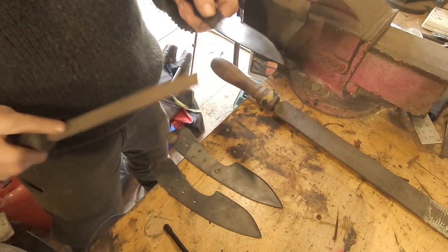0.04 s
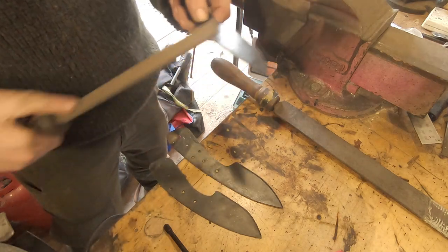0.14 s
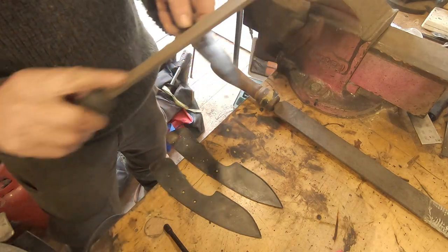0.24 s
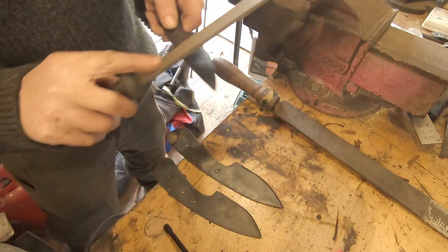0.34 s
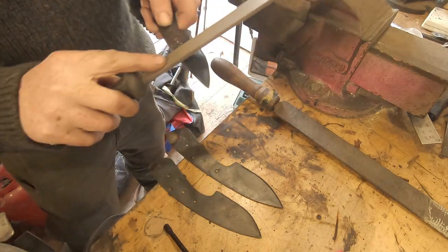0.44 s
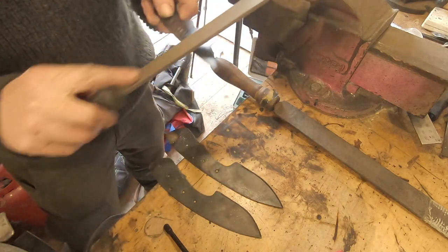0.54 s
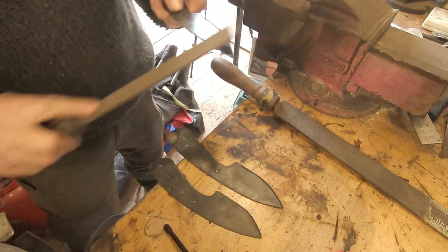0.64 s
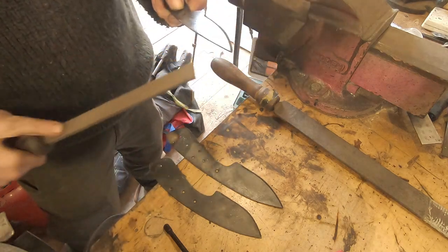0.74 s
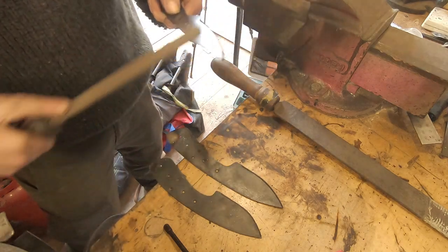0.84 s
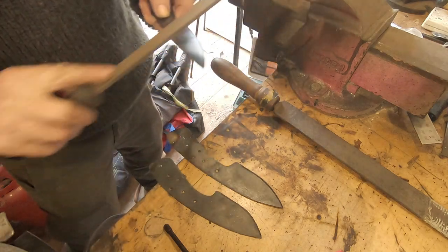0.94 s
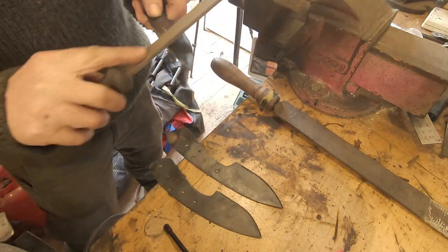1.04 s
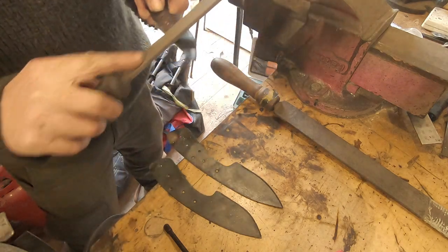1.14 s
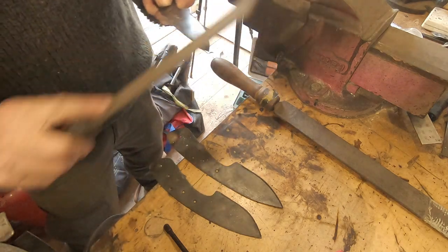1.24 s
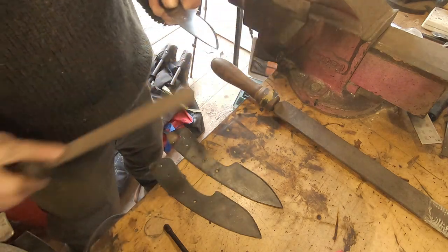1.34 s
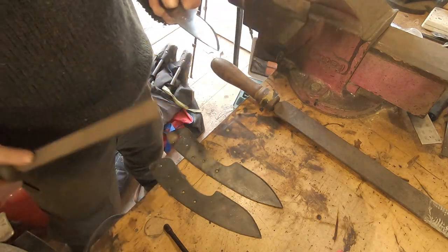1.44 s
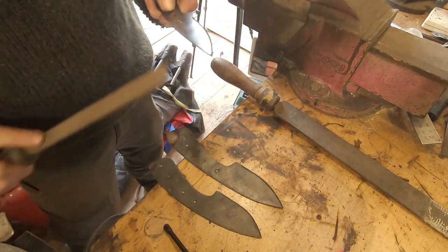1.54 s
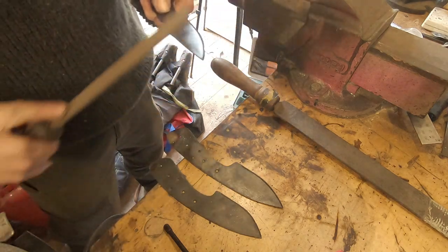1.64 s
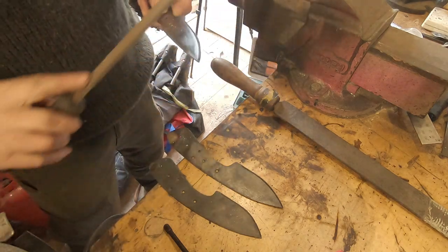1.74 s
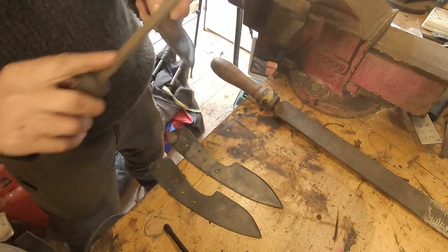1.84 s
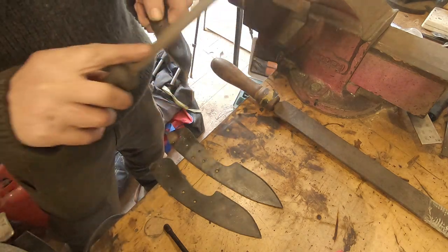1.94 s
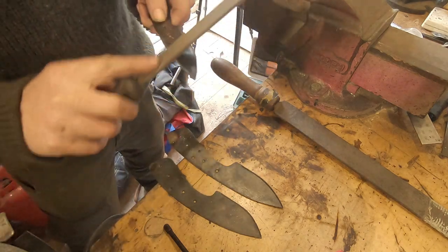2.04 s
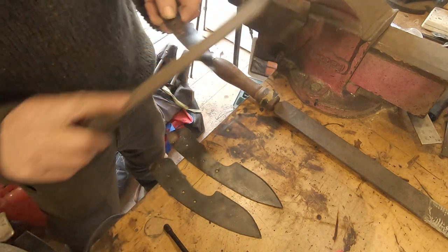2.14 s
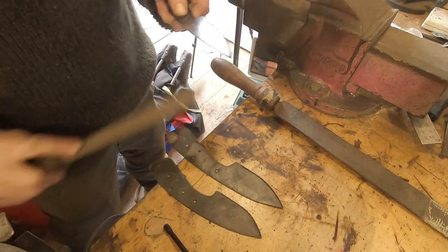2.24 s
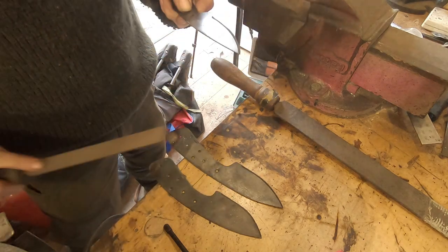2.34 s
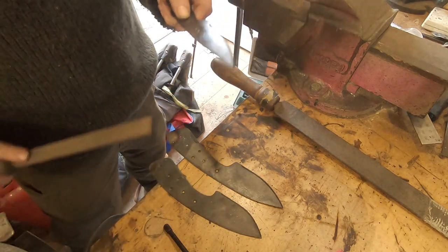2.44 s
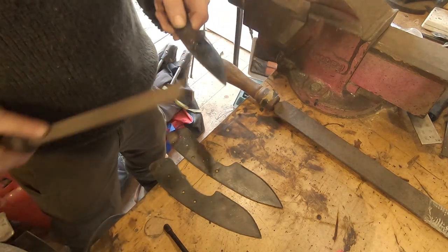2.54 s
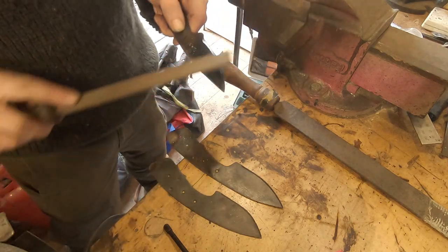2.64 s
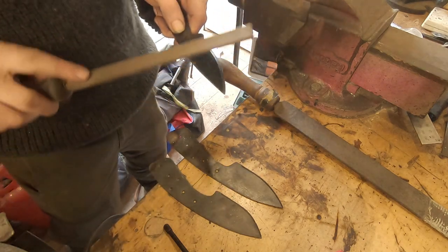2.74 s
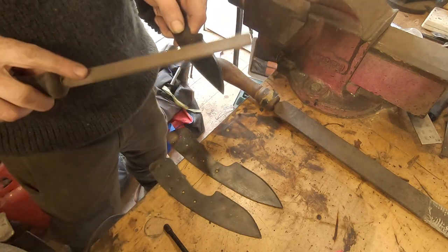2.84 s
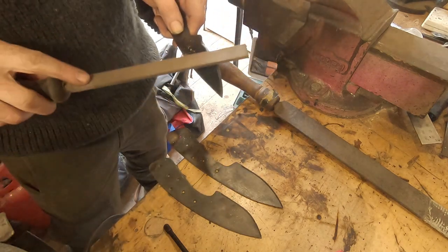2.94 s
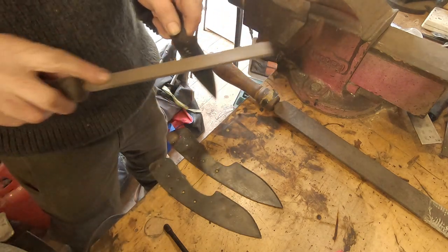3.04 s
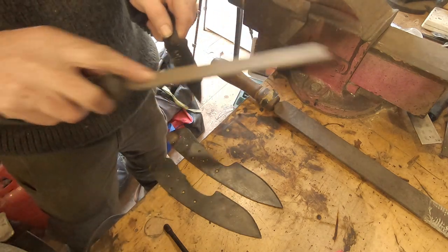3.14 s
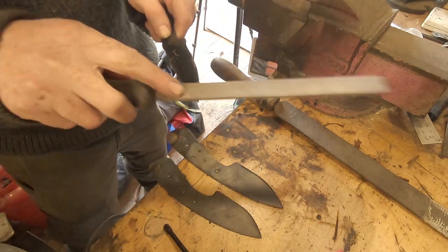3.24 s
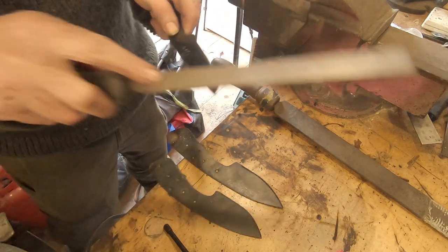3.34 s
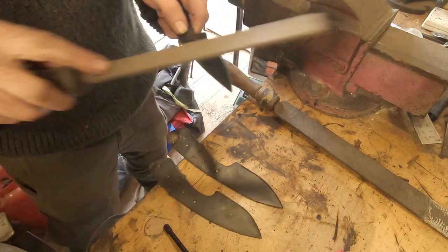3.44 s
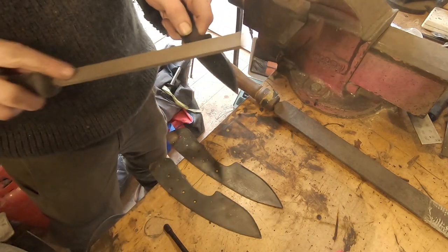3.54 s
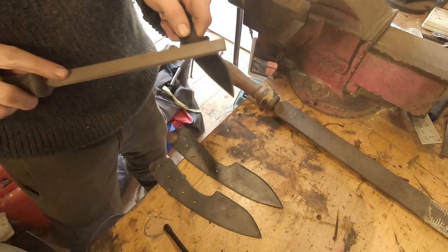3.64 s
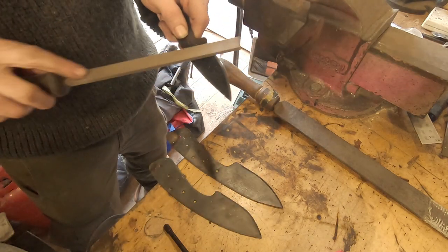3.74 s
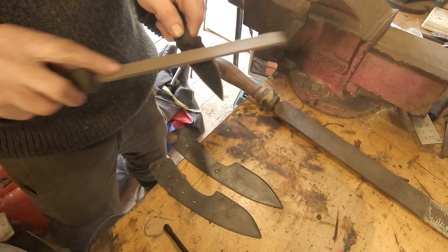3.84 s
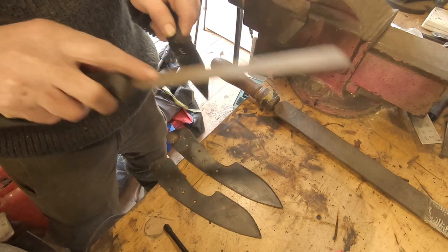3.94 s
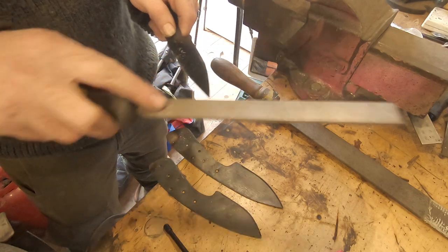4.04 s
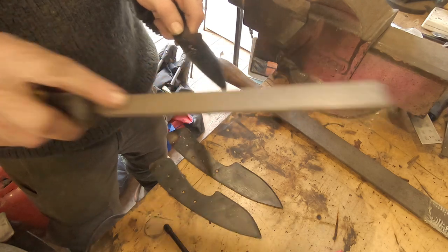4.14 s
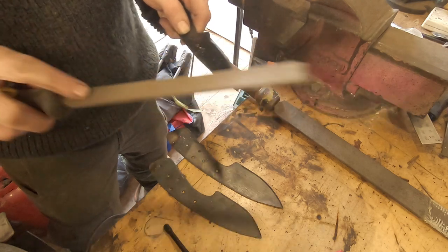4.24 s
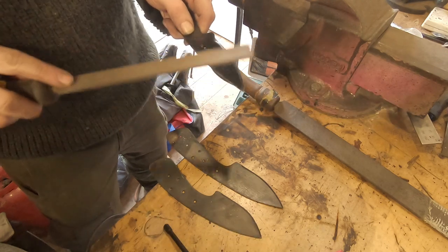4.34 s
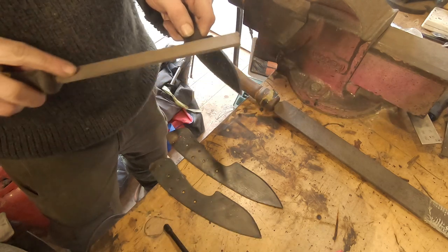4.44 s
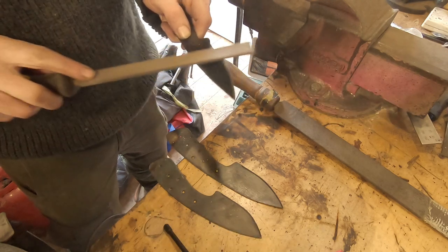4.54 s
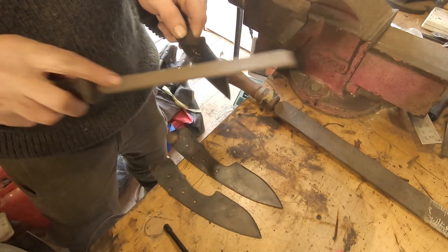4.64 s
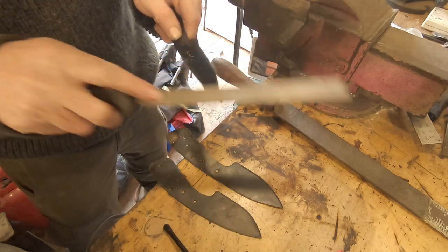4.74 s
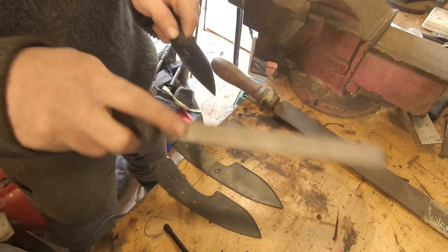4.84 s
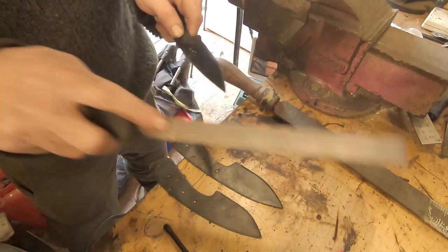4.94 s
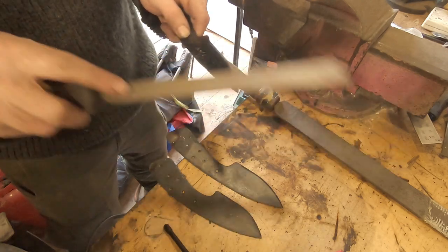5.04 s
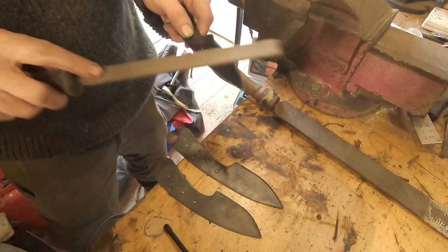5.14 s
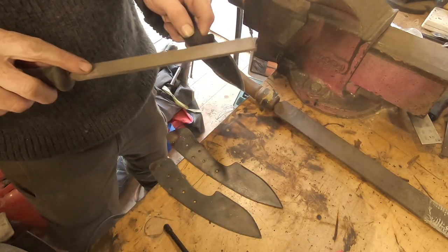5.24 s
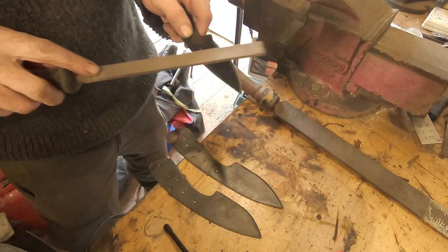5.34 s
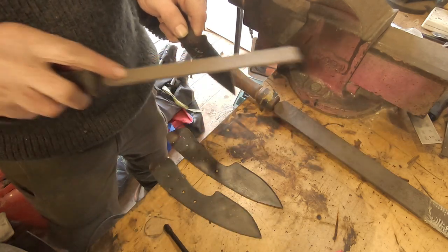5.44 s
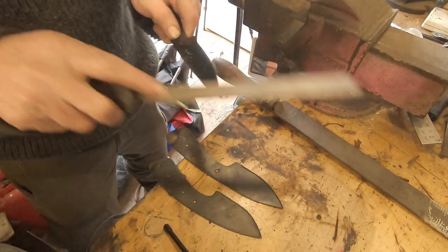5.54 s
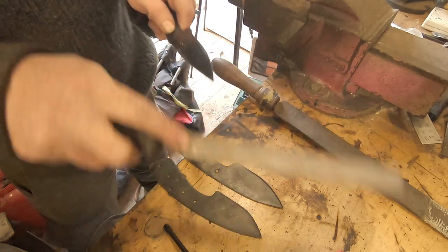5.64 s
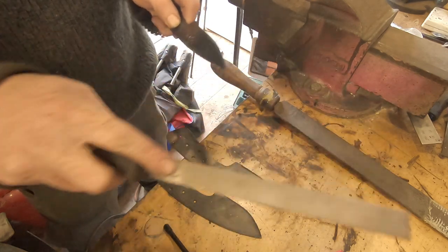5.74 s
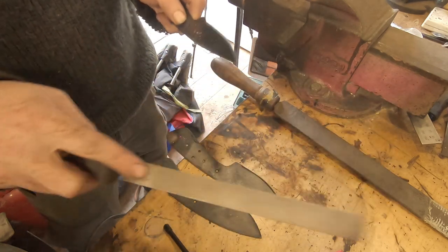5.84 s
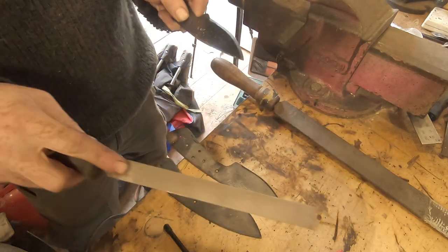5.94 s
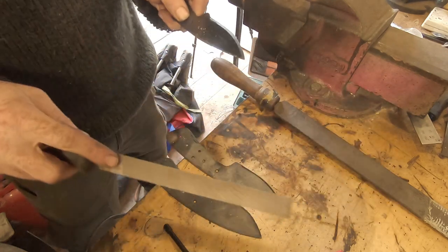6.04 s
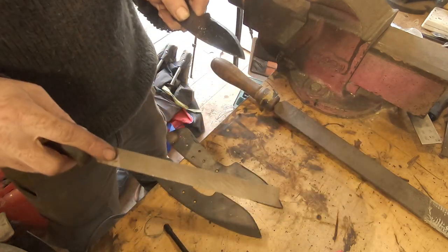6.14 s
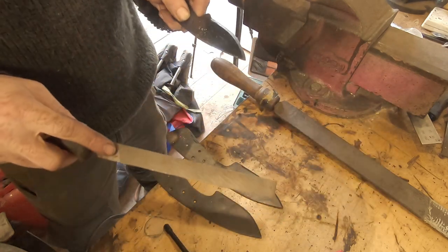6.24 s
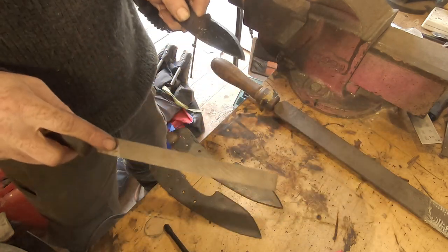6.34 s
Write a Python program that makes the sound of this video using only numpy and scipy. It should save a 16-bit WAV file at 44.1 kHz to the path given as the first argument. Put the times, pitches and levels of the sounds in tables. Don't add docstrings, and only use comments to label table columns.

```python
import sys
import numpy as np
from scipy import signal
from scipy.fft import rfft, irfft
from scipy.io import wavfile
from scipy.ndimage import uniform_filter1d, minimum_filter1d

SR = 44100
rng = np.random.default_rng(int(sys.argv[2]) if len(sys.argv) > 2 else 0)


def int16_out(signal):
    q = np.round(np.clip(np.atleast_2d(signal).T, -1, 1) * 32767)
    wavfile.write(sys.argv[1], SR, q.astype(np.int16))


def gain_from_db(level_db):
    decades = np.asarray(level_db, float) / 20
    return 10 ** decades


N = 281247

TURN_S = 2.6
UPPER_HZ = 5080
FIRST_MAIN_HZ, SECOND_MAIN_HZ = 2760, 2900
# (f/Hz, bandwidth/Hz, level/dB)
FIRST_RINGS = [(2260, 8.6, -10.5), (2460, 17, -4), (2780, 150, 1.5), (3560, 250, -9), (4654, 38, -7.5),
               (5107, 120, 1), (6570, 100, -3.5), (7013, 21, -14.5), (8500, 68, -22.5),
               (7760, 120.7, -17.5), (8500, 130, -18), (9300, 260, -6.5), (9870, 33, -14),
               (11894, 370, -28)]
# (f/Hz, bandwidth/Hz, level/dB)
SECOND_RINGS = [(1860, 29, -11), (2242, 22, -10.5), (2892, 130, -0.5), (3660, 67, -9.5), (4330, 57, -17),
                (5040, 90, -22), (5070, 190, -5), (6830, 47, -7), (7240, 73, -16.5), (7966, 21, -13),
                (9100, 55, -17.5), (12200, 300, -32), (10400, 41, -26.5), (9760, 350, -21.5)]
# (f/Hz, density/dB per Hz)
RASP = [(820, -56), (1400, -33), (1810, -7.5), (2310, -13), (2840, 1), (3370, -18.5), (4150, -9),
        (5170, -7.5), (5830, -9), (6510, -4.5), (7480, -19), (9420, -15.5), (10500, -25), (11100, -33),
        (12200, -30), (13200, -34), (15200, -33.5)]


def evened(x):
    return x / np.sqrt(np.mean(x ** 2) + 1e-20)


def read(points, hz):
    f, value = np.transpose(points)
    return np.interp(np.log(hz + 1), np.log(f + 1), value)


def add(mix, s, sound):
    part = mix[round(s * SR):][:len(sound)]
    part += sound[:len(part)]


def colour(x, points, lo_hz=1, hi_hz=SR):
    hz = np.fft.rfftfreq(len(x), 1 / SR) + 1
    band = ((1 + (lo_hz / hz) ** 16) * (1 + (hz / hi_hz) ** 16)) ** -.5
    return irfft(rfft(x) * gain_from_db(read(points, hz)) * band, len(x))


def resonate(x, hz, width):
    turn = np.exp(2j * np.pi * np.cumsum(hz * np.ones(len(x))) / SR)
    r = np.exp(-np.pi * width / SR)
    return 2 * (turn * signal.lfilter([1 - r], [1, -r], x / turn)).real


def wander(length, smooth_s):
    size = max(int(smooth_s * SR), 2)
    steps = uniform_filter1d(rng.standard_normal(length), size, mode="wrap")
    return uniform_filter1d(steps, size, mode="wrap") * np.sqrt(1.5 * size)


def patchy(x, depth_db):
    z = signal.stft(x, nperseg=256, noverlap=192)[2]
    patches = uniform_filter1d(uniform_filter1d(rng.standard_normal(z.shape), 5, 0), 16, 1)
    glide_hz_per_s = rng.uniform(-1, 1) * 20000
    glide = glide_hz_per_s * np.arange(z.shape[1]) * 64 * 256 / SR ** 2
    rows = (np.arange(len(z))[:, None] + glide.astype(int)) % len(z)
    patches = np.take_along_axis(patches, rows, 0)
    shaped = z * gain_from_db(depth_db * evened(patches))
    return evened(signal.istft(shaped, nperseg=256, noverlap=192)[1][:len(x)])


def air():
    # (f/Hz, density/dB per Hz)
    air_tone = [(25, -9.5), (60, -14), (118, -30), (138, -17), (152, -1), (215, -1.5), (270, -4.5),
                (330, -12), (480, -17.5), (780, -10.5), (1000, -16.5), (1600, -18), (2500, -26.5),
                (9000, -37.5), (16000, -46)]
    # (f/Hz, correlation/1)
    likeness = [(60, 0.81), (180, 0.8), (550, -0.16), (1650, -0.74), (4970, -0.46), (15000, -0.34)]
    frames, hz = N // 256 + 5, np.fft.rfftfreq(1024, 1 / SR)
    a, b, c, d, patches = rng.standard_normal((frames, 513, 5)).T
    patches = evened(uniform_filter1d(uniform_filter1d(patches, 10, 0), 20, 1))
    same = np.clip(read(likeness, hz), -1, 1)[:, None]
    left = a + 1j * b
    z = np.array([left, same * left + np.sqrt(1 - same ** 2) * (c + 1j * d)])
    z *= gain_from_db(read(air_tone, hz)[:, None] + 1.8 * patches)
    return gain_from_db(-66) * evened(signal.istft(z, nperseg=1024, noverlap=768)[1][:, :N])


def teeth(per_s, jitter=.35, uneven_db=2.0, grit=0.71):
    turns = np.cumsum(per_s * (1 + jitter * wander(len(per_s), .0006))) / SR
    knocks = np.diff(np.floor(turns), prepend=0) * gain_from_db(uneven_db * rng.standard_normal(len(turns)))
    return evened(knocks - knocks.mean()) + grit * rng.standard_normal(len(turns))


def modes_ringing(push, rings, bend, upper_bend, under_db):
    n = len(push)
    total = np.zeros(n)
    for hz, width, db in rings:
        swell = gain_from_db(1.6 * wander(n, .025))
        shift = upper_bend if 4600 < hz < 5400 else bend
        total += gain_from_db(db + under_db * (hz < 2500)) * resonate(push * swell, hz * shift, 85 + width)
    return total


def stroke(rows, slide, grip, rings, main_hz):
    band_edges = (100, 1500, 3400, 7500, 16000)
    judder_share = (0, 1.2, .4, .2)
    ring_share = (.86, .7, .55)
    # (f/Hz, density/dB per Hz)
    grind_tone = [(120, -33.5), (200, -11.5), (313, -20.5), (473, -17.5), (708, -9.5), (817, -13),
                  (1500, -2), (1950, -31.5), (3300, -120)]
    s, *columns = np.transpose(rows)
    t = np.arange(s[0], s[-1] + .05, 1 / SR)
    n = len(t)
    pressure_db, mid_db = (np.interp(t, s, c) for c in columns)
    at, *slid = np.transpose(slide)
    ring_hz, upper_hz, under_db = (np.interp(t, at, c) for c in slid)
    ring_hz = ring_hz * (1 + 0.007 * wander(n, 0.02))

    teeth_hz, grind_db, fizz_db, judder_db = grip
    judder_hz = 80 * (1 + .25 * wander(n, .012))
    judder = gain_from_db(judder_db * np.sin(2 * np.pi * np.cumsum(judder_hz) / SR))
    way = np.clip((t - s[0]) / (s[-1] - s[0]), 0, 1)
    per_s = teeth_hz * (1 + .06 * (way - .5) + .03 * wander(n, .03))
    low_db = grind_db + 0.19 * (-25.5 - pressure_db)
    high_db = mid_db + fizz_db
    landing = np.clip((t - s[0]) / .0015, 0, 1)
    touching = np.sqrt(np.clip((s[-1] + .0015 - t) / .0015, 0, 1))
    drive = patchy(teeth(per_s), 3.0) * gain_from_db(0.62 * wander(n, 0.0028))

    out = np.zeros(n)
    for k, tilt_db in enumerate((low_db - 5.5, 0, mid_db, high_db)):
        lo_hz, hi_hz = band_edges[k:k + 2]
        force = gain_from_db(pressure_db + tilt_db) * touching * judder ** judder_share[k]
        sound = evened(colour(drive, RASP if k else grind_tone, lo_hz, hi_hz)) * force
        if k:
            bend = ring_hz / main_hz if k == 1 else 1 + 0.014 * wander(n, 0.023)
            upper_bend = upper_hz / UPPER_HZ * (1 + 0.01 * wander(n, 0.013))
            in_band = [ring for ring in rings if max(lo_hz, 2100) <= ring[0] < hi_hz]
            ringing = modes_ringing(drive * force, in_band, bend, upper_bend, under_db)
            if k == 1:
                swell = gain_from_db(1.8 * wander(n, 0.021))
                ringing += gain_from_db(under_db - 10.5) * resonate(drive * force * swell, per_s, 100)
            ringing = colour(ringing, [(1, 0), (SR, 0)], max(0.76 * lo_hz, 1650), min(1.2 * hi_hz, 13000))
            share = ring_share[k - 1]
            sound = np.sqrt(1 - share) * sound + np.sqrt(share * np.mean(force ** 2)) * evened(ringing)
            wanted, given = (abs(uniform_filter1d(v ** 2, size=int(.03 * SR))) + 1e-14
                             for v in (force, sound))
            steady = .3 * uniform_filter1d(touching, size=400, origin=-199) ** 4
            sound = sound * (wanted / given) ** steady
        out += sound
    return s[0], out * np.sqrt(landing) * np.clip((t[-1] - t) / 0.034, 0, 1)


def graze(start, length, start_db, end_db, bite_db):
    if start < TURN_S:
        grip, rings, main_hz = (2000, -16, -9.5, -0.25), FIRST_RINGS, FIRST_MAIN_HZ
    else:
        grip, rings, main_hz = (2400, -28, -2.5, 0.2), SECOND_RINGS, SECOND_MAIN_HZ
    end = start + length
    slide = [(start, main_hz, UPPER_HZ, 0), (end, main_hz, UPPER_HZ, 0)]
    return stroke([(start, start_db, bite_db), (end, end_db, bite_db)], slide, grip, rings, main_hz)


def grazes(steel):
    # (t/s, length/s, start level/dB, end level/dB, bite/dB)
    touches = [(0.0, 0.031, -25.5, -47, -6), (0.285, 0.048, -78, -94, 8), (0.387, 0.028, -83, -81, 3),
               (0.441, 0.031, -50.5, -58.5, -13.5), (0.479, .037, -41.5, -34, -7),
               (1.068, 0.022, -33.5, -37, -5.5), (1.093, 0.038, -37, -51.5, -11.5),
               (2.026, 0.036, -43.5, -54, -2.5), (2.94, 0.085, -50.5, -77, -2),
               (3.307, 0.105, -71.5, -74, -7.5), (5.312, 0.026, -57, -59, -20)]
    for row in touches:
        add(steel, *graze(*row))


def linger(steel):
    hz, t60_s = 2440, 0.33
    width = np.log(1000) / np.pi / t60_s
    held = steel * (np.arange(N) < 1.6 * SR)
    return gain_from_db(-37) * resonate(held, hz, width) * np.sqrt(hz / width)


def ports(x):
    # (f/Hz, level/dB)
    side_tone = [(60, -8.5), (110, -7.5), (200, -10.5), (380, -6.5), (700, -7), (1290, 4), (2380, -12),
                 (4400, -8.5), (8120, 3), (15000, 2)]
    # (f/Hz, level/dB)
    balance = [(60, -1.5), (130, 0.5), (290, -0.5), (640, -0.5), (1410, 4), (3100, 3.5), (6820, -2.5),
               (15000, -1.5)]
    hz, t, z = signal.stft(x, SR, nperseg=256, noverlap=192)
    drift = np.cumsum(uniform_filter1d(rng.standard_normal(z.shape), 3, 0), 1) * .5
    difference = z * gain_from_db(read(side_tone, hz))[:, None] * np.exp(1j * drift)
    half = gain_from_db(read(balance, hz) / 2)[:, None]
    pair = np.array([(z + difference) * half, (z - difference) / half])
    return signal.istft(pair, SR, nperseg=256, noverlap=192)[1][:, :N]


def room(x):
    # (f/Hz, T60/s)
    decay = [(300, .17), (1500, .13), (2300, .14), (3000, .115), (5000, .105), (8000, .13), (11000, .12),
             (15000, .1)]
    taps_in = np.zeros((2, 16000))
    at = np.arange(100, 15980, 20) + rng.integers(0, 20, (2, 794))
    np.put_along_axis(taps_in, at, rng.choice([-1., 1.], at.shape), 1)
    hz, t, z = signal.stft(taps_in, SR, nperseg=128)
    tail = signal.istft(z * gain_from_db(-60 * t / read(decay, hz)[:, None]), SR, nperseg=128)[1]
    tail[1] = 0.18 * tail[0] + 0.8 * tail[1]
    return signal.fftconvolve(x[None], tail / np.linalg.norm(tail[0]), axes=1)[:, :N]


def sleeve():
    # (t/s, rise/s, fall/s, peak level/dB)
    rubs = [
        (.4, 0.042, 0.027, -79),
        (2.44, 0.14, 0.12, -61.5),
        (2.75, 0.24, 0.021, -71.5),
        (2.94, 0.062, 0.16, -59.5),
        (5.12, 0.16, 0.12, -70),
        (5.3, 0.17, 0.064, -55),
        (5.72, 0.14, 0.18, -69.5),
        (6.22, 0.18, 0.058, -69.5),
    ]
    # (f/Hz, density/dB per Hz)
    cloth = [(240, -55), (400, -17), (515, -17.5), (610, -4), (766, -14.5), (986, -12.5), (1570, -17),
             (1890, -24.5), (2500, -40), (3900, -69), (6600, -120)]
    out = np.zeros((2, N))
    for start, rise, fall, peak_db in rubs:
        s, away = start + np.cumsum([0, rise, fall]), np.array([1, 0, 1])
        t = np.arange(s[0], s[-1], 1 / SR)
        left, right = (colour(patchy(f, 6.0), cloth) for f in rng.standard_normal((len(t), 2)).T)
        swell = gain_from_db(peak_db - 19.5 * np.interp(t, s, away) ** 2) * signal.windows.tukey(len(t), .2)
        add(out[0], s[0], swell * evened(left + 0.27 * right))
        add(out[1], s[0], swell * evened(right + 0.42 * left))
    return out


def blade_face(s):
    # (f/Hz, bandwidth/Hz, level/dB)
    first_modes = [(1105, 430, -28), (2020, 250, -3.5), (2860, 330, -1.5), (3895, 140, -15.5),
                   (5080, 300, 0), (6490, 240, -2), (7900, 220, -11), (8960, 300, -11), (9400, 720, -13.5),
                   (12155, 380, -33.5)]
    # (f/Hz, bandwidth/Hz, level/dB)
    second_modes = [(2060, 200, -6), (2860, 170, -0.5), (4310, 180, -13.5), (5060, 360, 0.5),
                    (6660, 160, -6), (7630, 200, -13.5), (8930, 310, -10.5), (9780, 300, -9.5),
                    (12400, 300, -32.5)]
    return (first_modes, -12.5, 1060) if s < TURN_S else (second_modes, -6, 725)


def tap(peak_db, bright_db, main_hz, low_db, thud_db, modes, crack_db, thud_hz):
    t = np.arange(2600) / SR
    rings = np.zeros(len(t))
    for hz, width, db in modes:
        level_db = db + (bright_db + 7.5) * (hz > 3500) + low_db * (hz < 2400)
        ring_hz = main_hz if 2400 < hz < 3400 else hz
        rings += gain_from_db(level_db) * np.exp(-np.pi * .9 * width * t) * np.sin(2 * np.pi * ring_hz * t)
    crack = evened(colour(rng.standard_normal(len(t)), RASP)) * gain_from_db(crack_db - 60 * t / 0.012)
    sound = (rings + crack) * (1 - np.exp(-t / 0.00061))
    sound = signal.sosfilt(signal.butter(3, 1300, "highpass", fs=SR, output="sos"), sound)
    knock = np.sin(2 * np.pi * thud_hz * t) * (1 - np.exp(-t / 0.0013))
    thud = gain_from_db(thud_db - 60 * t / 0.017) * knock
    return gain_from_db(peak_db) * (sound / abs(sound).max() + thud)


def taps(steel):
    # (t/s, peak level/dB, brightness/dB, main ring f/Hz, low ring level/dB)
    landings = [
        (0.4401, -29, -10.5, 2720, -1),
        (0.487, -28, -8, 2770, -3),
        (1.068, -21.5, -7.5, 2980, -8),
        (2.023, -12, -5.5, 2545, -5.5),
        (2.935, -14, -5, 2893, -3),
        (3.7226, -15, -6.5, 2810, -2.5),
        (4.556, -11, -4.5, 2870, 1),
        (5.3098, -21, -5, 2820, 7.5),
    ]
    for s, *blow in landings:
        add(steel, s, tap(*blow, -19 if s < TURN_S else -26.5, *blade_face(s)))


def catches(steel):
    # (t/s, peak level/dB, brightness/dB)
    snags = [(.4805, -24.5, -6), (.4953, -20, -7.5), (1.156, -20, -8), (1.354, -12.5, -3.5),
             (2.0738, -23, -7), (2.0818, -22, -7), (2.0881, -13, -7), (2.1112, -9, -8), (2.2434, -9.5, -9),
             (2.259, -10.5, -8.5), (3.218, -14, -8.5), (4.6536, -19, -3.5), (4.705, -11, -8.5),
             (5.4571, -11, -12), (5.512, -8.5, -11), (5.626, -9.5, -7.5), (0.5188, -20.5, -8),
             (0.5244, -17.5, -8), (0.5609, -13.5, -6), (0.7294, -17, -8.5), (1.1405, -25.5, -7),
             (1.1697, -20, -8), (1.1808, -16, -8), (3.030, -35, -8.5), (3.0417, -33.5, -7),
             (3.048, -29, -5.5), (3.06, -22.5, -5), (3.118, -15, -8.5), (3.745, -26, -8.5),
             (3.757, -27, -9.5), (3.7677, -28, -9), (3.779, -21.5, -8.5), (3.782, -23.5, -8),
             (3.789, -23.5, -9), (3.793, -25.5, -8.5), (4.0184, -16.5, -6), (4.8403, -6.5, -10.5),
             (5.338, -34, -13), (5.346, -27, -11.5), (5.353, -26, -16), (5.3606, -35, -8),
             (5.3715, -21, -8), (5.3793, -18.5, -14), (5.3908, -24.5, -8), (5.399, -23, -6.5),
             (5.403, -20.5, -11.5), (5.417, -22, -12), (5.430, -21.5, -10), (5.4445, -11.5, -9.5)]
    for s, peak_db, bright_db in snags:
        add(steel, s, tap(peak_db - 5, bright_db, 2880, -1.5, -45, *blade_face(s)))


def bumps():
    # (t/s, length/s, level/dB)
    jolts = [
        (0.495, 0.098, -54.5),
        (0.739, 0.098, -61),
        (1.22, 0.11, -60),
        (1.948, 0.13, -62.5),
        (2.802, 0.088, -64.5),
        (3.002, 0.084, -63),
        (5.43, 0.083, -71.5),
    ]
    # (f/Hz, density/dB per Hz)
    bench = [(25, -9), (110, -14), (160, 0.5), (280, -4), (450, -10.5), (900, -38), (2000, -90)]
    out = np.zeros(N)
    for start, length, level_db in jolts:
        size = int(length * SR)
        rumble = evened(colour(rng.standard_normal(size), bench))
        add(out, start, gain_from_db(level_db) * rumble * np.hanning(size))
    return out


def strokes(steel):
    # (t/s, pressure level/dB, bite of the teeth/dB)
    first_side = [
        [(0.517, -31, -7), (0.529, -26.5, -7), (0.605, -23.5, 1), (0.621, -27.5, 5), (0.677, -21, -3.5),
         (0.681, -24.5, 1), (0.733, -26, -7.5), (0.743, -40.5, -6.5), (0.755, -40, -11)],
        [(1.137, -45.5, -6), (1.163, -30.5, -11), (1.191, -30, 0.5), (1.233, -26.5, 5), (1.251, -22.5, -5),
         (1.257, -25.5, 2), (1.349, -23, 2.5), (1.357, -33, 3), (1.37, -40, -7)],
        [(2.068, -42, -3), (2.114, -25, 0.5), (2.144, -25.5, 6.5), (2.152, -19.5, -4), (2.176, -26, 7),
         (2.212, -26, 1.5), (2.243, -21, -2.5), (2.263, -21.5, -4), (2.288, -43, -3)],
    ]
    # (t/s, pressure level/dB, bite of the teeth/dB)
    second_side = [
        [(3.02, -62, 0.5), (3.04, -46, 4.5), (3.072, -42.5, 5.5), (3.124, -24.5, -4.5), (3.154, -25, -4.5),
         (3.19, -24.5, -6), (3.222, -27.5, -8.5), (3.258, -42.5, -3), (3.275, -58, -7)],
        [(3.727, -45, -6), (3.731, -40.5, -7), (3.809, -32, -9.5), (3.823, -21, -10.5), (3.953, -25, -1.5),
         (3.963, -31, 4), (3.977, -24, -12.5), (4.027, -35, 4), (4.05, -64, -2.5)],
        [(4.562, -39, -3.5), (4.568, -37, -9), (4.652, -28.5, -5), (4.674, -26, -9), (4.688, -24, -7.5),
         (4.704, -26.5, -7), (4.792, -26, -2.5), (4.844, -23, -7), (4.853, -58, -2)],
        [(5.335, -50.5, -11.5), (5.351, -39.5, -10.5), (5.453, -25.5, -9), (5.455, -22, -7.5),
         (5.503, -24, -11.5), (5.573, -23.5, -1), (5.631, -25, -3.5), (5.635, -55, -2), (5.655, -45.5, -10.5)],
    ]
    # (t/s, main ring f/Hz, upper ring f/Hz, low rings level/dB)
    first_slide = [
        [(0.52, 2930, 5030, -0.5), (0.652, 2740, 5020, -2.5), (0.75, 2800, 5020, -2)],
        [(1.14, 3020, 5000, 0.5), (1.226, 2690, 5070, -3.5), (1.365, 2860, 5080, 0.5)],
        [(2.07, 2810, 5070, 0.5), (2.28, 2740, 5060, -1.5)],
    ]
    # (t/s, main ring f/Hz, upper ring f/Hz, low rings level/dB)
    second_slide = [
        [(3.03, 2850, 5230, 3.5), (3.27, 2890, 5040, -0.5)],
        [(3.73, 2880, 4950, 1), (3.852, 3030, 4920, -10.5), (3.94, 2750, 5200, 3.5), (4.04, 2920, 5010, 0.5)],
        [(4.565, 2910, 5060, -2), (4.85, 2860, 5120, 2)],
        [(5.34, 2820, 5120, 9.5), (5.466, 2860, 4820, -1), (5.528, 2860, 5090, 5), (5.64, 2790, 5064, 11.5)],
    ]
    # (tooth rate/Hz, grind/dB re pressure, fizz/dB re bite, judder/dB)
    first_grip = [
        (2030, -21, -7.5, 1.36),
        (2163, -21.5, -9.5, 1.5),
        (1859, -23, -10, 2.2),
    ]
    # (tooth rate/Hz, grind/dB re pressure, fizz/dB re bite, judder/dB)
    second_grip = [
        (2177, -23.5, -13, 2.5),
        (1951, -21.5, -11.5, 1.2),
        (2104, -21.5, -9, 2.5),
        (2113, -21.5, -11, 1.8),
    ]
    for row in zip(first_side, first_slide, first_grip):
        add(steel, *stroke(*row, FIRST_RINGS, FIRST_MAIN_HZ))
    for row in zip(second_side, second_slide, second_grip):
        add(steel, *stroke(*row, SECOND_RINGS, SECOND_MAIN_HZ))


def zip_tone(start, length, from_hz, to_hz, level_db):
    way = np.arange(0, length, 1 / SR) / length
    per_s = from_hz + (to_hz - from_hz) * way
    tone = resonate(resonate(teeth(per_s), per_s, 140), per_s, 120)
    swell = gain_from_db(level_db - 13 * (2 * way - 1) ** 2) * signal.windows.tukey(len(way), .3)
    return start, swell * evened(tone)


def zips(steel):
    # (t/s, length/s, from f/Hz, to f/Hz, level/dB)
    glides = [(0.652, 0.11, 1600, 1460, -46), (.66, .07, 1200, 1050, -47), (2.09, .075, 1680, 1850, -36),
              (2.175, 0.046, 1750, 1780, -40.5), (2.1, .05, 1150, 1300, -50.5),
              (5.5, .14, 1693, 1420, -39.5), (3.135, .075, 1500, 1450, -39.5),
              (2.9, .05, 1300, 1050, -50.5), (3.115, .055, 1700, 2260, -39), (3.195, .04, 2200, 2180, -36),
              (3.812, 0.074, 1560, 1500, -36.5), (3.865, 0.12, 1720, 2250, -30),
              (3.925, 0.091, 2600, 1300, -38), (3.955, 0.083, 1800, 1100, -46),
              (3.955, 0.054, 720, 400, -58), (2.15, 0.12, 3500, 4300, -31), (.59, .08, 3800, 6000, -27.5),
              (3.17, 0.042, 3800, 4000, -33), (3.9, .08, 4950, 5250, -30.5),
              (3.115, 0.099, 2800, 2940, -24), (3.81, 0.079, 3000, 3080, -25),
              (3.9, .06, 2800, 2740, -28.5), (4.66, .13, 2700, 2900, -24), (1.235, .03, 2900, 2200, -24),
              (3.31, .115, 3050, 3600, -72), (3.32, .09, 2900, 2900, -77), (3.11, .085, 4200, 5400, -34.5),
              (2.1, 0.12, 520, 880, -58.5), (2.03, .1, 970, 560, -61), (2.07, 0.11, 1350, 1500, -44),
              (4.74, .05, 6700, 7100, -27.5), (5.54, 0.056, 6600, 6650, -30.5),
              (3.9, 0.11, 6500, 6800, -35), (.52, .06, 3100, 2900, -28), (1.28, .075, 2900, 3100, -26.5),
              (4.6, 0.039, 6200, 6700, -41.5)]
    for row in glides:
        add(steel, *zip_tone(*row))


def shuffle():
    # (start t/s, attack/s, hold/s, release/s)
    timing = (1.742, .006, .022, .034)
    # (f/Hz, density/dB per Hz)
    dull = [(110, -50), (170, 6.5), (398, -10.5), (680, -6), (847, -14), (1550, -7.5), (2040, -22),
            (2600, -28), (4000, -58), (5200, -78), (8800, -120)]
    start, *parts = timing
    s = np.cumsum([0, *parts])
    t = np.arange(0, s[-1], 1 / SR)
    noise = evened(colour(rng.standard_normal(len(t)), dull))
    swell = gain_from_db(-53 + np.interp(t, s, [-10.5, 1.5, -4.5, -13]))
    return start, swell * noise * signal.windows.tukey(len(t), .2)


def scene():
    steel = np.zeros(N)
    grazes(steel)
    taps(steel)
    catches(steel)
    strokes(steel)
    zips(steel)
    add(steel, *shuffle())
    steel = steel + linger(steel)
    return gain_from_db(-2.0) * ports(steel) + gain_from_db(-8) * room(steel) + air() + sleeve() + bumps()


def band_limit(x):
    return signal.sosfilt(signal.butter(12, 16110, fs=SR, output="sos"), x)


def record(dry):
    ahead = np.pad(dry, ((0, 0), (0, 1400)))
    leaked = dry.copy()
    for lead, db in ((441, -30.5), (882, -41.0), (1323, -54.5)):  # 10, 20 and 30 ms early
        leaked += gain_from_db(db) * ahead[:, lead:lead + N]
    peaks = -minimum_filter1d(-abs(leaked).max(0), size=129)
    over = uniform_filter1d(peaks, size=129) / .5 + 1e-9
    limited = leaked * (1 + over ** 4) ** -.25
    edge = signal.firwin(255, 15050, window=("kaiser", 7), fs=SR)
    edge[127] += gain_from_db(-30)
    finished = signal.oaconvolve(limited, edge[None], "same")
    return band_limit(finished)


dry = scene()
out = record(dry)
int16_out(out)
```